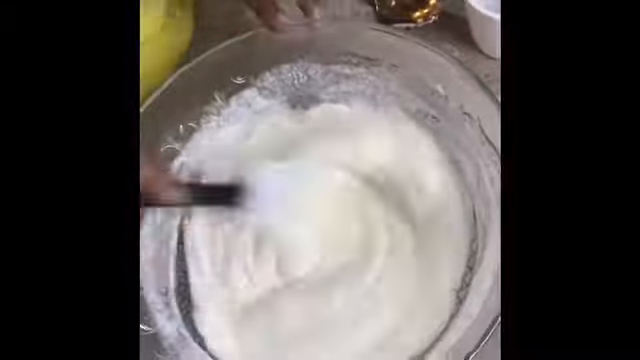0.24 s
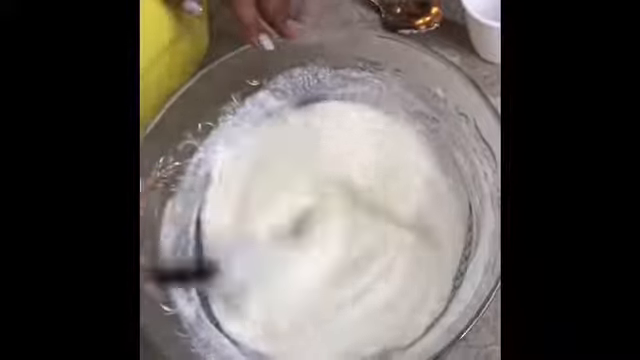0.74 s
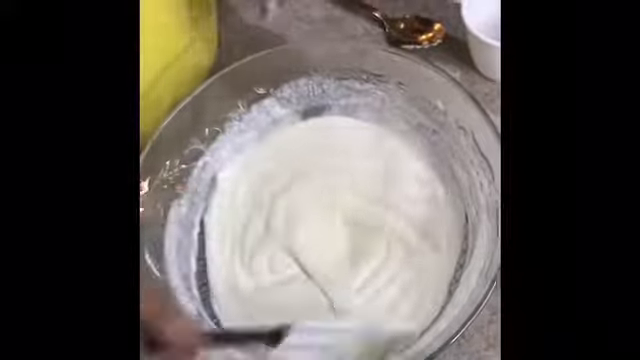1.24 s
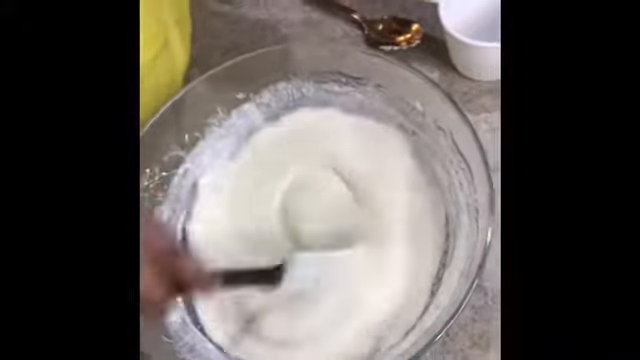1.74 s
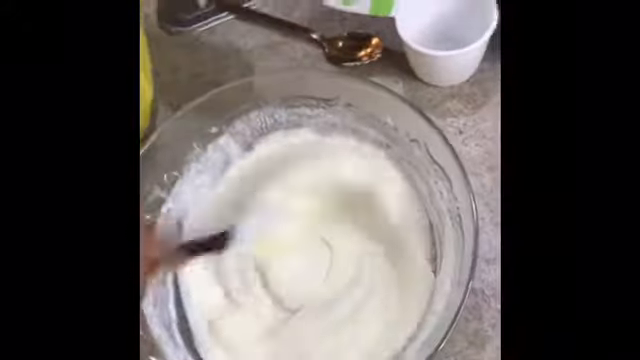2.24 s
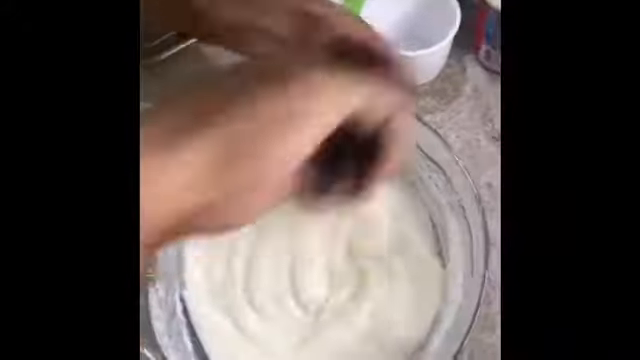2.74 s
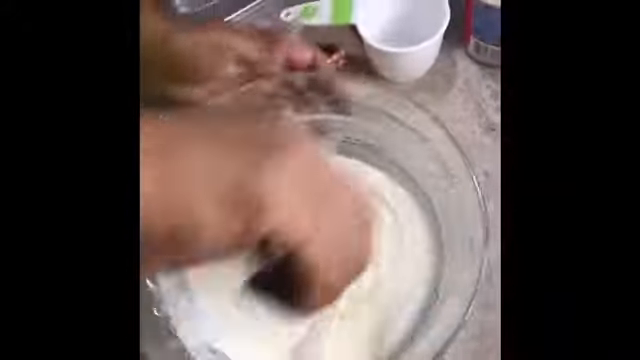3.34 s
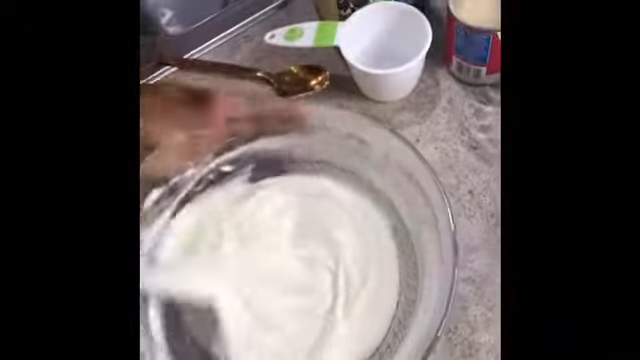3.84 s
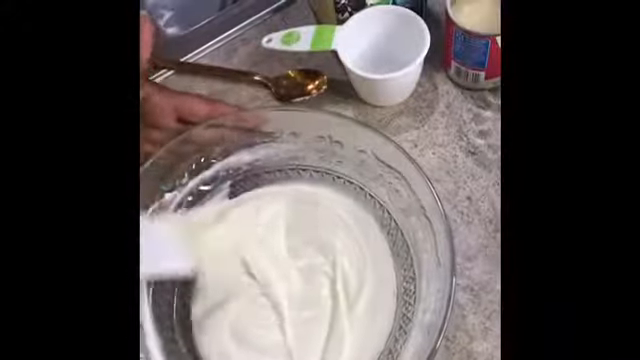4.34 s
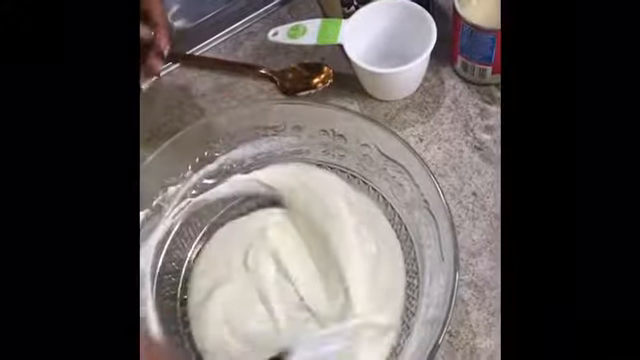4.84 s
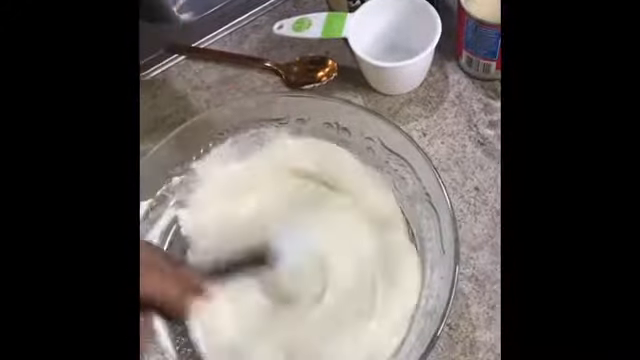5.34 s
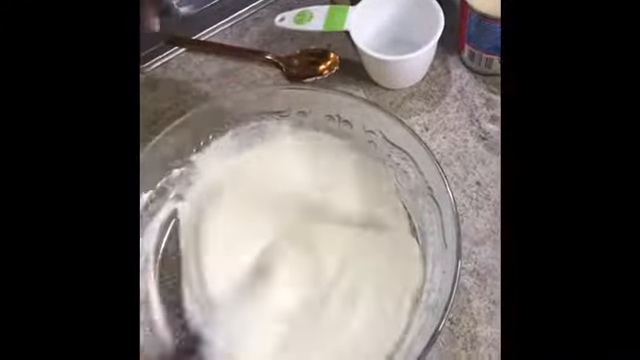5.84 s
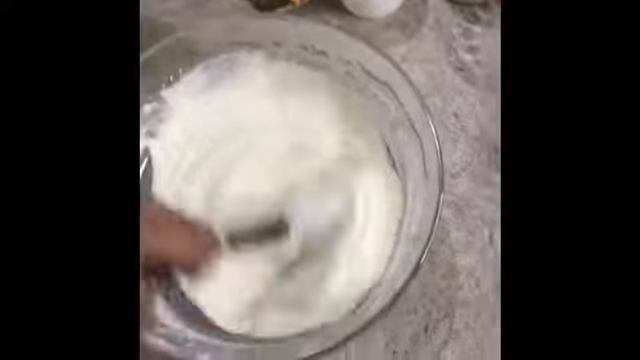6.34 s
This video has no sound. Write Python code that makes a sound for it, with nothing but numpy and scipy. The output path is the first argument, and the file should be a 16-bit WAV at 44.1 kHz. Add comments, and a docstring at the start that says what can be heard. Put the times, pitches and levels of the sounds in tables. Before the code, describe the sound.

A spatula beats thick batter in a glass bowl, close to the microphone. Damped glassy knocks and dry snaps come irregularly over a dull churn and low rumble. Around the middle the beating eases into a dull thump and several soft, tacky wipes round the wall. Then beating resumes with small rasps, bubbling plops and one strong clack. A small kitchen hums and hisses faintly.

```python
"""Quick glassy clacks, close to the microphone: a spatula folds thick batter in a glass bowl on a counter.
Each knock is a contact plus damped and free glass modes; low swells of air from the arm and a dull,
uneven churn run underneath. Air pockets snap and plop as clicks and rising tones; the bowl bumps softly.
Halfway the beating eases for a few slow wipes of shaped noise round the wall of the bowl.
The room hums and hisses, with faint chirps and thin, fuzzy, wandering high tones."""
import sys
import numpy as np
from scipy import signal
from scipy.fft import rfft, irfft
from scipy.io import wavfile
from scipy.ndimage import map_coordinates

SR = 44100
rng = np.random.default_rng(int(sys.argv[2]) if len(sys.argv) > 2 else 0)


def generate_wav(signal):
    """Clip the signal to [-1, 1] and save it as 16-bit WAV at the path in sys.argv[1]."""
    frames = np.transpose(np.atleast_2d(signal))
    scaled = np.clip(frames, -1, 1) * 32767
    pcm = np.round(scaled).astype(np.int16)
    wavfile.write(sys.argv[1], SR, pcm)


N = 290616
TIME = np.arange(N) / SR  # seconds through the whole scene
RING = np.arange(SR // 2) / SR  # seconds through one short sound

# modes of the filled bowl, damped by the batter: mode_hz, level_db, t60_s
BOWL_MODES = [(626, -5.5, 0.058), (781, 2, 0.058), (875, -17.5, 0.099), (1171, -10, 0.062),
              (1217, -30, 0.0089), (1514, -10.5, 0.029), (2466, -23, 0.037), (2930, -18, 0.024),
              (3330, -27, 0.018), (4450, -19, 0.015)]


def amp(db):
    """Decibels to gain."""
    return 10 ** (np.asarray(db) / 20)


def unit(x):
    """x at rms 1."""
    return x / np.sqrt(np.mean(x ** 2) + 1e-20)


def along(points, hz):
    """(Hz, value) points read on a log frequency axis."""
    point_hz, value = np.transpose(points)
    return np.interp(np.log(hz + 1e-3), np.log(point_hz), value)


def curve(rows):
    """(s, value) points as one value per sample."""
    s, value = np.transpose(rows)
    return np.interp(TIME, s, value)


def wobble(rate):
    """A smooth random curve, rate knots a second."""
    knots = rng.standard_normal(int(N * rate / SR) + 4)
    return map_coordinates(knots, [TIME * rate])


def fade(t60):
    """A decay that loses 60 dB in t60 seconds."""
    return amp(-60 * RING / t60)


def add(track, s, sound):
    """Mix a sound into the track at s seconds."""
    part = track[max(round(s * SR), 0):][:len(sound)]
    part += sound[:len(part)]


def coloured(x, spectrum):
    """x through a (Hz, dB) colour, at rms 1."""
    gain = amp(along(spectrum, np.fft.rfftfreq(len(x), 1 / SR)))
    return unit(irfft(rfft(x) * gain, len(x)))


def noise(spectrum):
    """Steady noise of rms 1."""
    return coloured(rng.standard_normal(N), spectrum)


def sparse_ticks(per_s):
    """Ticks of random size and sign at chance moments of the scene."""
    return (rng.random(N) < per_s / SR) * rng.standard_normal(N)


def burst(spectrum, t60):
    """A puff of noise that starts at rms 1 and dies away."""
    return coloured(rng.standard_normal(len(RING)), spectrum) * fade(t60)


def chatter(spectrum, t60, per_s):
    """A quick run of tiny contacts that starts at rms 1 and dies away."""
    signs = np.sign(rng.standard_normal(len(RING)))
    slips = (rng.random(len(RING)) < per_s / SR) * signs
    return coloured(slips, spectrum) * fade(t60)


def pulse(spectrum, tilt_db=0):
    """A causal click of peak 1 with this colour; tilt_db lifts the top octaves."""
    size = len(RING)
    hz = np.fft.rfftfreq(size, 1 / SR)
    tilt = tilt_db * along([(3000, 0.015), (10000, 0.95)], hz)
    # folding the cepstrum forward gives minimum phase: the energy comes as early as it can
    cepstrum = irfft(np.log(amp(along(spectrum, hz) + tilt)), size)
    cepstrum[1:size // 2] *= 2
    cepstrum[size // 2:] = 0
    click = irfft(np.exp(rfft(cepstrum)), size)
    return click / np.abs(click).max()


def in_kitchen(sound, wet_db):
    """A short sound plus the answer of counter and walls 4 ms later, drawn anew each time."""
    # reverberation of the kitchen: band_hz, t60_s
    decay = [(200, 0.54), (800, 0.39), (2500, 0.28), (6000, 0.13), (14000, 0.2)]
    hz, t, z = signal.stft(rng.standard_normal(len(RING)), SR, nperseg=256)
    decayed = z * amp(-60 * t / along(decay, hz)[:, None])
    tail = signal.istft(decayed, SR, nperseg=256)[1]
    tail = np.pad(tail / np.linalg.norm(tail), (int(0.004 * SR), 0))
    return sound + amp(wet_db) * signal.fftconvolve(sound, tail)[:len(sound)]


def rippled(x, ripple_db, spacing_hz):
    """x with the narrow fixed peaks and dips that wall reflections give a steady sound."""
    hz = np.fft.rfftfreq(N, 1 / SR)
    ripple = map_coordinates(rng.standard_normal(2048), [hz / spacing_hz], mode="wrap")
    depth = along([(10000, 1), (12000, 0)], hz)
    return unit(irfft(rfft(x) * amp(ripple_db * depth * np.clip(ripple, -2, 2)), N))


def knocks():
    """A push and a dense clack; the damped ring sags in pitch, the free glass swells up and lingers, beating."""
    # spatula on glass: start_s, level_db, pitch_hz of the damped body, body_db, low_db of the lower wall,
    # crack_db, edge_db of the tick, soft_hz where the soft contact ends
    strikes = [(0.088, -37, 820, 0.5, 1, -2, -3, 5600), (0.45, -24, 799, 6, -3.5, 1, -8.5, 4300),
               (0.787, -33.5, 796, 1, -3.5, -5, 1, 5500), (1.721, -27, 801, 1.5, 2, 2, -13.5, 4900),
               (2.063, -25, 805, 0, 2, -7, -10, 5240), (2.397, -26, 843, 2.5, -17, -5.5, -1, 5900),
               (5.249, -22.5, 827, 4, -8.5, 0.5, -17, 4300)]
    # free glass above the batter: mode_hz, level_db, t60_s
    glass_modes = [(448, -21, 0.48), (577, -35, 0.86), (711, -11, 0.32), (753, -16, 0.35),
                   (794, -7.5, 0.19), (830, -28, 0.35), (877, -27, 0.25), (948, -18, 0.16),
                   (980, -26, 0.29), (1150, -31, 0.21)]
    # colours of the hard contact, the clack and the edge tick: band_hz, level_db
    crack_colour = [(100, -39), (400, -18), (700, 17), (1300, 5.5), (2000, 3.5), (3100, 6), (3800, -9.5),
                    (4700, 7.5), (5600, -24), (9000, -11), (12000, -31), (16000, -56)]
    clack_colour = [(400, -25), (900, 2.5), (1500, 0.5), (3000, -6), (4300, -3.5), (5600, -16),
                    (12000, -31)]
    edge_colour = [(1000, -1), (3600, -16), (4500, 6.5), (5700, 8), (7200, 1), (9000, 5), (11000, -2.5),
                   (15000, -6), (16000, -26)]
    bowl_hz = 790  # pitch_hz at which the bowl modes start as listed
    sag, sag_s = 0.12, 0.022  # share by which the pitch falls, time constant
    wall_low_hz, wall_high_hz, body_top_hz = 550, 745, 1400
    out = np.zeros(N)
    sagging = np.cumsum(1 - sag * (1 - np.exp(-RING / sag_s))) / SR
    bloom = 1 - np.exp(-(RING / 0.02) ** 2)
    for s, db, pitch_hz, body_db, low_db, crack_db, edge_db, soft_hz in strikes:
        ring, linger = np.zeros((2, len(RING)))
        for hz, level, t60 in BOWL_MODES:
            region_db = low_db if hz < wall_high_hz else body_db if hz < body_top_hz else 0
            level += region_db + rng.normal(0, 2.5)
            ring += amp(level) * np.cos(2 * np.pi * hz * pitch_hz / bowl_hz * sagging) * fade(t60)
        for hz, level, t60 in glass_modes:
            level += low_db * (wall_low_hz < hz < wall_high_hz) + rng.normal(0, 1.03)
            linger += amp(level) * np.sin(2 * np.pi * (hz * RING + rng.random())) * fade(t60)
        glass = amp(-3.5) * (in_kitchen(ring, wet_db=-15) + bloom * linger)
        clack = chatter(clack_colour, t60=0.037, per_s=2500)
        contact = amp(crack_db) * pulse(crack_colour) + amp(-15) * clack
        low_pass = signal.butter(4, min(soft_hz, SR / 3), fs=SR, output="sos")
        high_pass = signal.butter(2, 380, "high", fs=SR, output="sos")
        soft = signal.sosfilt(np.vstack([low_pass, high_pass]), glass + in_kitchen(contact, wet_db=-8.5))
        tick = amp(edge_db) * (pulse(edge_colour) + amp(-7.5) * burst(edge_colour, t60=0.011))
        add(out, s, -amp(db) * (soft + in_kitchen(tick, wet_db=-10)))
    return out


def snaps():
    """Air pockets snap: single sharp, dry spikes with almost no ring."""
    # snaps in the batter: start_s, level_db, treble_db
    spikes = [(0.175, -17.5, -1), (1.498, -20, -1), (2.742, -28, -15.5), (1.082, -37.5, 7),
              (4.147, -33, -3), (5.470, -26.5, 0)]
    # colour of a snap: band_hz, level_db
    snap_colour = [(100, -3), (700, 4), (2000, 1.5), (5000, 1), (8000, -1.5), (11000, -6.5), (14000, -20),
                   (16000, -35)]
    out = np.zeros(N)
    for s, db, treble_db in spikes:
        add(out, s, -amp(db) * in_kitchen(pulse(snap_colour, tilt_db=treble_db), wet_db=-49))
    return out


def scrapes():
    """Short rasps: the blade catches and slips many times in quick succession on the coated glass."""
    # rasps: start_s, level_db rms at the start, t60_s
    rasps = [(0.147, -60, 0.026), (2.461, -63, 0.11), (2.848, -54, 0.052), (3.411, -57.5, 0.12),
             (4.541, -54, 0.019), (5.589, -50, 0.032), (5.597, -45.5, 0.025), (5.63, -54, 0.029),
             (5.797, -58.5, 0.074), (5.815, -58, 0.06)]
    # colour of a rasp: band_hz, level_db
    rasp_colour = [(300, -8), (900, 3), (1800, 1), (2400, -4.5), (3400, -2), (4500, -8), (10000, -14),
                   (16000, -25)]
    out = np.zeros(N)
    for s, db, t60 in rasps:
        add(out, s, amp(db) * in_kitchen(chatter(rasp_colour, t60, per_s=900), wet_db=-12.0))
    return out


def wipes():
    """The blade rubs the coated wall: a tacky swish whose resonance rises with pressure, under fine fizz."""
    # slow wipes: peak_s of firmest pressure, rise_s, fall_s, level_db, resonance_hz at full pressure,
    # resonance_db, fizz_db
    rubs = [(3.02, 0.064, 0.052, -59.5, 1470, -5.5, -11), (3.219, .13, 0.12, -54, 1560, -6, -11),
            (3.758, 0.11, 0.097, -51.5, 1030, -10.5, -22), (4.271, 0.093, 0.13, -61.5, 760, -14, -28)]
    # colours of the swish, its sticky crackle and the crushed fine foam: band_hz, level_db per Hz
    swish_colour = [(100, 11), (400, 9), (560, 8), (750, 11), (1000, 5.5), (1800, 1), (2300, -5),
                    (3600, -3.5), (4600, -13), (6000, -11), (10000, -23.5), (16000, -26)]
    tack_colour = [(500, 11), (1600, 10), (2500, 9), (8000, -6), (14000, -22), (16000, -14)]
    fizz_colour = [(2000, -30), (3600, 13), (5000, -14), (8500, -3), (11500, -7), (14500, -9), (16000, -2)]
    glide, width_octaves = 0.07, 0.29  # share by which the resonance rises, spread to each side
    out = np.zeros(N)
    for s, rise, fall, db, hz, resonance_db, fizz_db in rubs:
        pressure = np.exp(-.5 * ((TIME - s) / np.where(TIME < s, rise, fall)) ** 2)
        step = 2 ** width_octaves
        band = noise([(hz / 4, -60), (hz / step, -18), (hz, 0), (hz * step, -14), (hz * 4, -60)])
        # reading the noise more slowly lowers its pitch
        reading = np.cumsum(1 - glide * (1 - pressure))
        resonance = map_coordinates(band, [reading], mode="wrap")
        tack = coloured(sparse_ticks(450), tack_colour)
        rub = rippled(noise(swish_colour), ripple_db=2.5, spacing_hz=123.7)
        rub += amp(resonance_db) * resonance
        rub += amp(-11) * tack
        rub += amp(fizz_db) * noise(fizz_colour)
        out += amp(db + 1.66 * wobble(24.59)) * pressure * unit(rub)
    return out


def strays(per_s, db, hz, cycles):
    """Rows (s, dB, Hz, cycles) of fainter pockets of chance pitch at chance moments."""
    waits = -np.log(1 - rng.random(64)) / per_s
    times = np.cumsum(waits)
    octaves = rng.uniform(-0.98, 0.98, 64)
    rows = np.column_stack([times, np.full(64, db), hz * 2 ** octaves, np.full(64, cycles)])
    return rows[times < N / SR]


def pockets(rows, rise, burst_db, wet_db):
    """A film of batter tears with a tiny click, and the air pocket behind it rings with rising pitch."""
    out = np.zeros(N)
    for s, db, hz, cycles in rows:
        life = fade(cycles / hz)
        phase = 2 * np.pi * np.cumsum(hz * (1 + rise * (.5 - life))) / SR
        ring = np.sin(phase) * life * (1 - np.exp(-RING * hz))
        tear = pulse([(hz / 6, -18), (hz / 2, -7), (hz, 0), (hz * 1.37, -8), (hz * 3, -32)])
        add(out, s, amp(db) * in_kitchen(ring + amp(burst_db) * tear, wet_db))
    return out


def bubbles():
    """Tiny bubbles burst in the batter, high and brief, with fainter ones at random."""
    # the clearest bubbles: start_s, level_db, pitch_hz, ring_cycles
    clear = [(0.39, -54, 12500, 23), (1.082, -45.5, 8300, 23), (1.227, -51, 9200, 17),
             (1.589, -51, 9900, 23), (1.738, -45, 8600, 23), (2.089, -45, 7750, 15), (3.061, -39, 8660, 37),
             (4.345, -41, 4600, 51), (5.271, -37, 8600, 18), (5.454, -49.5, 4140, 39),
             (5.59, -47, 8750, 23), (5.631, -44, 8800, 23), (5.689, -45, 8740, 23),
             (5.912, -46.5, 7950, 35), (5.922, -50, 9300, 23), (6.509, -44, 9400, 53)]
    stray = strays(per_s=4, db=-70, hz=8500, cycles=19)
    return pockets([*clear, *stray], rise=0.11, burst_db=3.5, wet_db=-9.0)


def plops():
    """Larger air pockets open behind the blade and ring lower, with fainter ones at random."""
    # the clearest plops: start_s, level_db, pitch_hz, ring_cycles
    clear = [(0.912, -55.5, 1690, 47), (2.287, -49, 1230, 26), (4.812, -45.5, 414, 29),
             (5.598, -45, 825, 24), (5.629, -55, 1770, 49), (5.7, -52.5, 1230, 35), (5.741, -54, 1410, 27),
             (5.797, -47, 920, 34), (5.799, -55, 1640, 45), (5.812, -52, 1780, 45), (5.823, -55, 1440, 40)]
    stray = strays(per_s=1, db=-58, hz=983, cycles=29)
    return pockets([*clear, *stray], rise=0.056, burst_db=-5, wet_db=-10.0)


def bumps():
    """Dull pushes of bowl and hand through the counter, about one swing long, with a knock above them."""
    # soft bumps: centre_s, level_db, pitch_hz, knock_db relative to the push
    pushes = [(1.546, -41.5, 132, -29), (1.754, -34.5, 93, -13.5), (2.744, -39.5, 160, -5.5),
              (2.785, -44.5, 140, 2), (2.815, -46, 198, -1), (2.832, -45, 108, -6), (2.856, -31, 83, -8),
              (4.542, -39.5, 122, -5), (4.626, -49, 110, -20), (4.988, -37, 59.3, -14),
              (5.143, -40.5, 106, -22), (5.329, -38, 112, -6), (5.97, -40.5, 103, -14)]
    knock_colour = [(100, -10), (230, 6.0), (420, 1), (700, -14.5), (2000, -32), (8000, -42)]
    out = np.zeros(N)
    for s, db, hz, knock_db in pushes:
        turns = hz * (TIME - s)
        out += amp(db) * np.sin(2 * np.pi * turns) * np.exp(-(turns / 0.67) ** 2)
        knock = burst(knock_colour, t60=0.065) * (1 - np.exp(-RING / 0.0023))
        add(out, s - 0.00263, amp(db + knock_db) * knock)
    return out


def nudges():
    """The blade leans on the bowl through the batter, and a low mode near 626 Hz hums briefly."""
    # gentle nudges: start_s, level_db
    leans = [(1.179, -62.5), (5.188, -54)]
    hum_hz = BOWL_MODES[0][0]
    hum = np.sin(2 * np.pi * hum_hz * RING) * fade(0.26) * (1 - np.exp(-RING / 0.0042))
    out = np.zeros(N)
    for s, db in leans:
        add(out, s, amp(db) * hum)
    return out


def effort():
    """The vigour of the arm in dB: a slow curve with a very slight, almost regular pulse three times a second."""
    # vigour of the beating, which eases during the wipes: time_s, effort_db
    vigour = [(0, -2.5), (1.2, 0), (2.85, -4.5), (3.3, -9), (4.3, -12), (4.55, -2), (5.2, -6.5),
              (6.59, 3.5)]
    pulse_hz, first_peak_s, pulse_db = 3.0, 0.15, 0.5
    turns = pulse_hz * (TIME - first_peak_s) + 0.01 * wobble(1.0)
    return curve(vigour) + pulse_db * np.cos(2 * np.pi * turns)


def batter(effort_db):
    """The blade drags through the mass: a dull, uneven churn with a sparse sticky crackle."""
    # colour of the churn: band_hz, level_db per Hz
    churn_colour = [(80, 2), (200, -2), (400, 3), (520, -8), (750, -4), (1100, -12), (2000, -27.5),
                    (6000, -30)]
    crackle_colour = [(300, -2.0), (900, 11.0), (2000, -1.0), (6000, -3.0), (11000, -4), (16000, -42)]
    drag = amp(-62.5 + 0.011 * effort_db + 2.1 * wobble(9.6))  # barely follows the effort
    crackle = coloured(sparse_ticks(70), crackle_colour)
    return drag * (noise(churn_colour) + amp(-13.5) * crackle)


def arm(effort_db):
    """The moving arm wafts air at the microphone and shakes it."""
    # colours of the wafted air and the handling rumble: band_hz, level_db per Hz
    swell_colour = [(.5, -18.5), (2.7, 4.5), (6, -8), (10, -16), (16, -18.5), (25, -40), (45, -48.5),
                    (100, -99)]
    rumble_colour = [(10, 0), (25, 4.5), (50, -2), (70, -11), (100, -13), (160, -22), (300, -36.5),
                     (800, -57), (3000, -120)]
    # level of the low handling rumble: time_s, level_db
    rumble_level = [(0, -41), (0.7, -48), (1.1, -47.5), (1.45, -54), (1.6, -48.5), (2.2, -44.5), (2.9, -46),
                    (3.3, -52), (4.3, -56), (4.55, -44.5), (5.2, -47), (6.59, -44)]
    to_edge_s = np.minimum(TIME, TIME[-1] - TIME)
    ease = np.sin(np.pi / 2 * np.clip(to_edge_s / 0.077, 0, 1)) ** 2  # the swells start and end gently
    swell = ease * amp(-17.5 + effort_db) * noise(swell_colour)
    rumble = amp(curve(rumble_level) + 3.0 * wobble(8.4)) * noise(rumble_colour)
    return swell + rumble


def chirps():
    """A thin, fuzzy trill of narrow noise around one quick upward slur."""
    # faint high chirps: start_s, level_db
    calls = [(.555, -62), (1.035, -62), (2.06, -66), (3.56, -66), (3.999, -69), (4.99, -67), (6.09, -66)]
    trill = noise([(6000, -50), (7200, -12), (7600, -4), (7900, -24), (8400, -73)])
    hz = 7750 - 900 * np.exp(-RING / 0.011)
    slur = np.sin(2 * np.pi * np.cumsum(hz) / SR) * np.exp(-((RING - .012) / 0.019) ** 2)
    out = np.zeros(N)
    for s, db in calls:
        add(out, s, amp(db) * slur)
        out += amp(db - 6.0) * trill * np.exp(-.5 * ((TIME - s + 0.0085) / 0.061) ** 2)
    return out


def high_tones():
    """Thin, fuzzy high tones that set in gradually and wander together, each flickering in and out."""
    # high tones: tone_hz before drift, level_db before waver
    tones = [(7980, -95), (8520, -94), (8950, -91), (9420, -92), (9850, -97)]
    drift_hz = 90 * wobble(1.5)
    out = np.zeros(N)
    for hz, db in tones:
        waver_db = 5 * np.clip(wobble(2.34), -2, 1)
        flicker_db = 3 * np.clip(wobble(25), -2, 1)
        fuzzy_hz = hz + drift_hz + 55 * wobble(150)
        tone = np.sqrt(2) * np.sin(2 * np.pi * np.cumsum(fuzzy_hz) / SR)
        out += amp(db + waver_db + flicker_db) * tone
    return out * np.clip(TIME / 1.6, 0, 1) ** 3


def background():
    """Room air, a slightly unsteady appliance hum and a slowly swelling hiss."""
    # colours of the air and the hiss: band_hz, level_db per Hz
    air_colour = [(60, 0.5), (200, 0.5), (400, -7.5), (620, -4.5), (900, -18), (1300, -16.5), (1900, -24.5),
                  (3000, -21.5), (8000, -40.5)]
    hiss_colour = [(500, 4), (1800, -12.5), (2800, -2), (3800, 1.5), (5600, 3.5), (6500, -0.5),
                   (7500, -5.5), (9300, -8), (11000, -16), (13000, -19), (16000, -56)]
    # appliance hum: tone_hz, level_db rms before its wobble
    hum_tones = [(58, -77), (93, -68), (240, -75), (278, -72), (331, -78), (400, -77), (1385, -80)]
    air = amp(-59.5) * rippled(noise(air_colour), ripple_db=2.5, spacing_hz=41.5)
    hum = np.zeros(N)
    for hz, db in hum_tones:
        tone = np.sqrt(2) * np.sin(2 * np.pi * hz * TIME + 1.18 * wobble(7.3))
        hum += amp(db + 2.0 * wobble(2.96)) * tone
    hiss_db = curve([(0, -69.5), (3.72, -62.5)])  # grows evenly, then holds
    hiss = amp(hiss_db) * rippled(noise(hiss_colour), ripple_db=2.5, spacing_hz=42.05)
    return air + hum + hiss


def scene():
    """Everything as it reaches the one microphone."""
    effort_db = effort()
    blade = knocks() + snaps() + scrapes() + wipes()
    air_pockets = bubbles() + plops()
    bowl = bumps() + nudges()
    stirring = batter(effort_db) + arm(effort_db)
    high = chirps() + high_tones()
    return (blade + air_pockets + bowl + stirring + high + background())[None]


def record(dry):
    """The recorder's low-pass filter cuts what lies above 16.3 kHz."""
    low_pass = signal.firwin(401, 16300, fs=SR)[None]
    padded = np.pad(dry, ((0, 0), (200, 200)), mode="edge")
    return signal.fftconvolve(padded, low_pass, mode="valid")


dry = scene()
out = record(dry)
generate_wav(out)
```